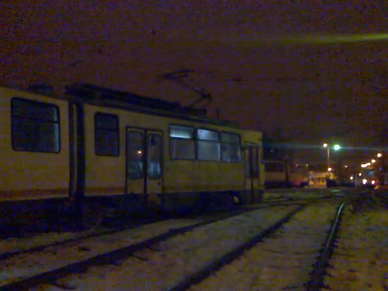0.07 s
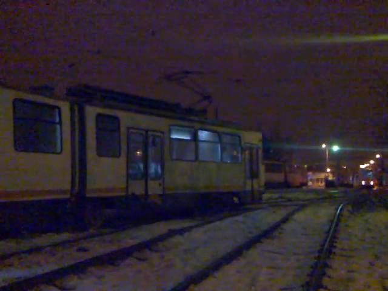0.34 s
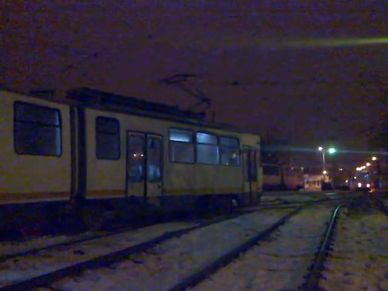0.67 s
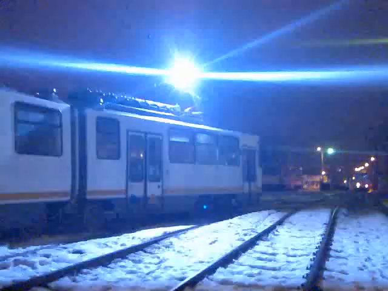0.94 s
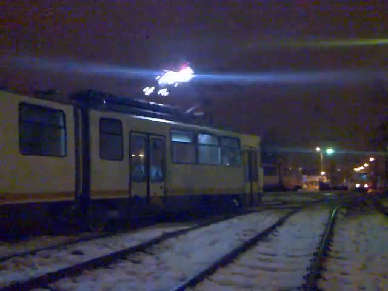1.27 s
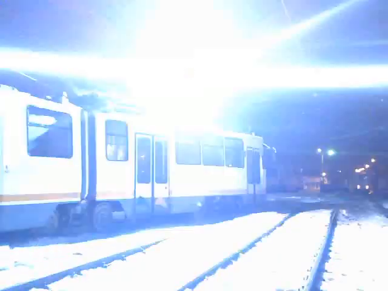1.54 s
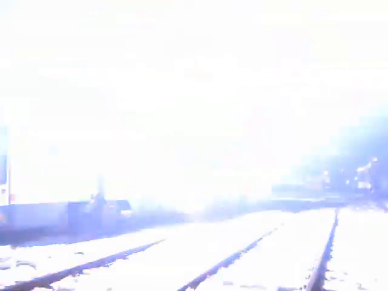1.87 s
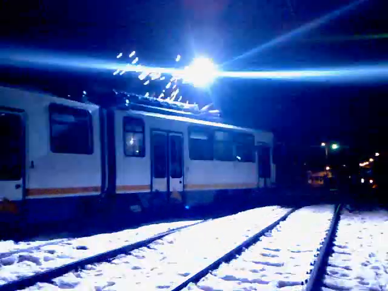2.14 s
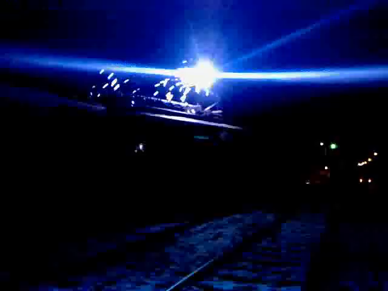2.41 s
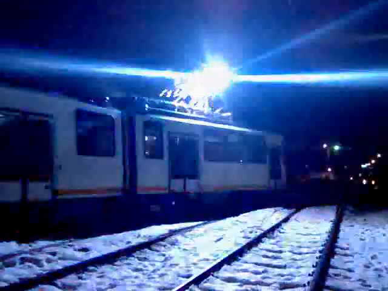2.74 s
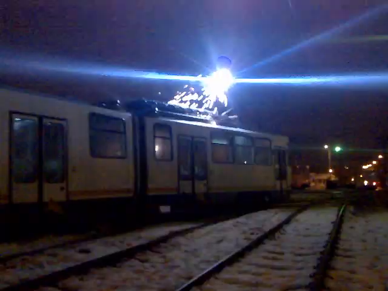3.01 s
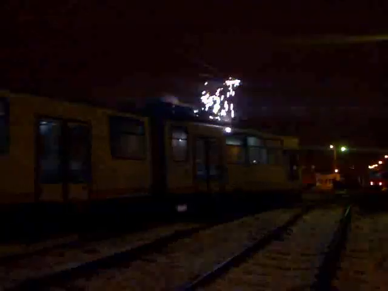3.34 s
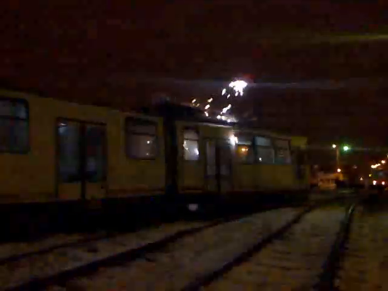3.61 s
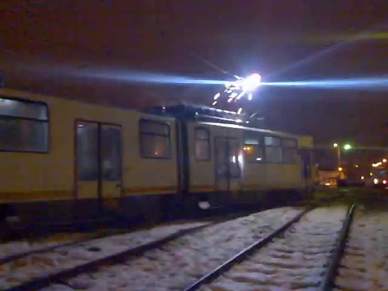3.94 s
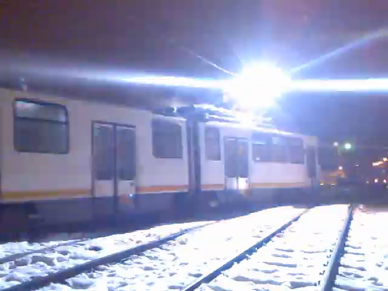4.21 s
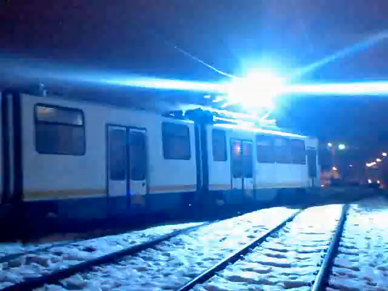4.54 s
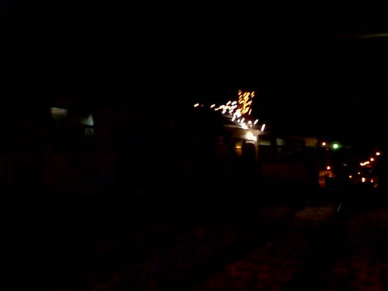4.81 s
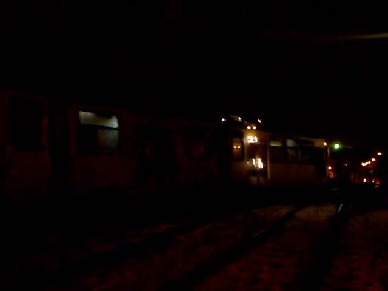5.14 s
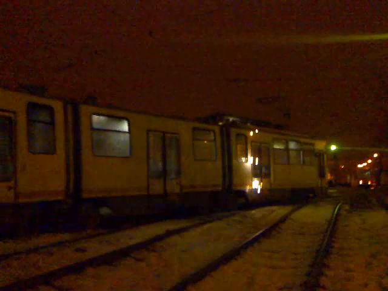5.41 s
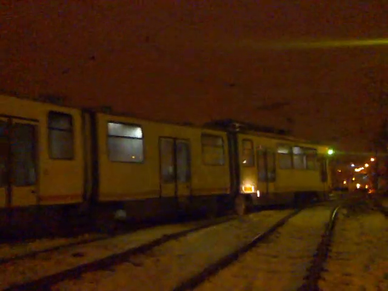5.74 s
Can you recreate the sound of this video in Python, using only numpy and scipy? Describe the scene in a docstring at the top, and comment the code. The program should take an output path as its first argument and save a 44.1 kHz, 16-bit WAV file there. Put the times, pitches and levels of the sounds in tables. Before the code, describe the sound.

Harsh electric arcs crackle, buzz and snap from a tram's overhead wire, over the low rumble and knocks of the slowly rolling car.

```python
"""A snowy tram yard at night: a tram creeps through, its pantograph arcing on an icy overhead wire.
Each loss of contact burns and fries; sparks snap, flashovers crack, and heated air thumps after two.
The car roof, the ground and the yard echo the sparks. Underneath, the tram rumbles, hisses, whines
and knocks, and wind buffets the microphone. A limiter holds the loudest arcs."""
import sys
import numpy as np
from scipy import signal
from scipy.fft import rfft, irfft
from scipy.io import wavfile
from scipy.ndimage import uniform_filter1d, minimum_filter1d

SR = 44100
rng = np.random.default_rng(int(sys.argv[2]) if len(sys.argv) > 2 else 0)


def master(y):
    """Save y as 16-bit WAV."""
    cut = np.clip(np.atleast_2d(y).T, -1, 1)
    pcm = np.round(cut * 32767)  # scale
    wavfile.write(sys.argv[1], SR, pcm.astype(np.int16))


N = 254456
T = np.arange(N) / SR


def undb(db):
    """Decibels to gain."""
    return 10 ** (np.asarray(db) / 20)


def curve(rows, column=1):
    """One table column, linearly interpolated over time."""
    rows = np.array(rows)
    return np.interp(T, rows[:, 0], rows[:, column])


def unit_rms(x):
    """Scale to rms 1."""
    return x / np.sqrt(np.mean(x ** 2))


def add(out, start_s, x):
    """Mix x into out from start_s on."""
    i = max(int(start_s * SR), 0)
    out[i:i + len(x)] += x[:max(N - i, 0)]


def bin_gains(spectrum, size):
    """Gain per FFT bin from (f/Hz, level/dB) points."""
    hz, db = np.transpose(spectrum)
    return undb(np.interp(np.log(np.fft.rfftfreq(size, 1 / SR) + 1), np.log(hz), db))


def noise(spectrum, size=N):
    """Coloured noise, rms 1."""
    return unit_rms(irfft(rfft(rng.standard_normal(size)) * bin_gains(spectrum, size), size))


def pulse(spectrum, size=1024):
    """Minimum-phase pulse, peak 1."""
    cepstrum = irfft(np.log(bin_gains(spectrum, size)))
    cepstrum[1:size // 2] *= 2
    cepstrum[size // 2 + 1:] = 0
    wave = irfft(np.exp(rfft(cepstrum)))
    return wave / np.abs(wave).max()


def lowpass(x, hz):
    """One-pole treble loss."""
    return signal.sosfilt(signal.butter(1, min(hz, SR / 2 - 1000), fs=SR, output="sos"), x)


def split(x, hz):
    """Complementary bands below and above hz."""
    bin_hz = np.fft.rfftfreq(len(x), 1 / SR)
    below = irfft(rfft(x) / (1 + (bin_hz / hz) ** 8), len(x))
    return below, x - below


def wander(rate_hz):
    """Smooth random drift, rms 1."""
    hold = max(int(SR / rate_hz), 1)
    steps = np.repeat(rng.standard_normal(N // hold + 1), hold)
    return unit_rms(uniform_filter1d(steps, hold)[:N])


def sine(hz):
    """Sine following a frequency track."""
    return np.sin(2 * np.pi * np.cumsum(hz) / SR)


# microphone hiss: t/s, level/dB
MIC_HISS_LEVEL = [(0, -52), (.2, -55), (.35, -51), (.6, -59), (1.0, -62.5), (5.77, -67)]
# gusts: peak t/s, half width/s, level/dB
GUSTS = [(0, 0.0094, -17), (.125, 0.0198, -22.5), (.22, 0.018, -33.5), (0.326, 0.0385, -22.5),
         (.39, 0.069, -33.5)]
# wind buffeting: f/Hz, level/dB
BUFFET_SPECTRUM = [(15, -15.5), (35, -5.5), (70, 1.5), (130, -4.5), (190, -9.5), (300, -34), (600, -40.5),
                   (2000, -54.5)]


def wind(breeze_db=-63):
    """Gusts over a light breeze buffet the microphone, above its thin hiss."""
    gusts = sum(undb(db) * np.exp(-((T - peak_s) / width_s) ** 2) for peak_s, width_s, db in GUSTS)
    buffet = noise(BUFFET_SPECTRUM) * (undb(breeze_db) + gusts)
    return buffet + rng.standard_normal(N) * undb(curve(MIC_HISS_LEVEL))


# running gear: t/s, rumble level/dB, hiss level/dB
GEAR_LEVELS = [(0, -38.5, -49.5), (.4, -38, -49), (.65, -49, -59), (1.0, -50, -60.5), (1.3, -40, -46),
               (3.3, -46.5, -55), (3.7, -42.5, -50.5), (3.9, -46, -51), (4.35, -36.5, -45),
               (4.93, -47, -52.5), (5.1, -41, -48), (5.25, -48, -54), (5.5, -41, -49), (5.77, -42, -49.5)]
# rolling rumble: f/Hz, level/dB
RUMBLE_SPECTRUM = [(15, -14), (35, 1), (70, 3), (130, -4.5), (230, -2.5), (320, -7.5), (430, -24),
                   (700, -40), (2000, -58)]
# machinery hiss: f/Hz, level/dB
HISS_SPECTRUM = [(100, 5.5), (400, 0), (600, 6), (1000, 1.5), (1500, 2.5), (2000, -3), (2500, 4),
                 (3400, -7), (4000, -4), (5200, -8.5), (6500, -14), (9000, -29.5), (16000, -19)]
# machinery tones: f/Hz, relative level/dB
MACHINE_TONES = [(562, -11.5), (2405, -13.5), (2535, -16.5), (2962, -21), (3897, -19), (5300, -23)]
# all tones against the hiss: t/s, gain/dB
TONE_GAIN = [(0, -5.5), (4.9, 2), (5.1, 0.5), (5.77, 7)]


def running_gear():
    """The rolling car rumbles; its machinery hisses, with faint wavering tones."""
    rumble = noise(RUMBLE_SPECTRUM) * undb(curve(GEAR_LEVELS) + 1.19 * wander(18))
    tones = sum(sine(hz + 7 * wander(45)) * undb(db + 4.26 * wander(5.8)) for hz, db in MACHINE_TONES)
    hiss = noise(HISS_SPECTRUM) * undb(1.39 * wander(35))
    machinery = hiss + tones * undb(curve(TONE_GAIN))
    return rumble + machinery * undb(curve(GEAR_LEVELS, column=2))


# motor whine: t/s, f/Hz, level/dB
WHINE = [(3.8, 395, -83.5), (4.02, 407, -50), (4.13, 414, -46), (4.3, 431, -43.5), (4.45, 434, -48),
         (4.65, 442, -66), (4.9, 450, -67)]


def motor():
    """The traction motor's whine rises in pitch, swells and fades."""
    return sine(curve(WHINE) + 3 * wander(30)) * undb(curve(WHINE, column=2))


# wheel and coupling knocks: t/s, thud level/dB, clank level/dB
KNOCKS = [(3.688, -29.5, -59.5), (4.544, -29, -51.5), (4.635, -31.5, -65.5), (4.724, -30.5, -54),
          (4.821, -31, -51.5), (5.038, -30.5, -45.5), (5.275, -39, -39), (5.426, -27.5, -48.5),
          (5.62, -49, -36), (5.739, -32, -47.5)]
# low thud of car body or heated air: f/Hz, level/dB
THUD_SPECTRUM = [(20, -1), (60, 2.5), (230, -1.5), (320, -8.5), (450, -29.5), (1200, -50)]
# rattling steel: f/Hz, level/dB
CLANK_SPECTRUM = [(200, -2), (650, 13), (1400, -7), (2400, -6), (4000, -17.5), (9000, -37.5)]


def knocks(thud_t60_s=0.1645, clank_t60_s=0.229, attack_s=0.0027):
    """Wheels and couplings shake the car body low down and rattle its steel."""
    out, age = np.zeros(N), T[:SR // 3]
    for start_s, thud_db, clank_db in KNOCKS:
        thud = noise(THUD_SPECTRUM, len(age)) * undb(thud_db - 60 * age / thud_t60_s)
        clank = noise(CLANK_SPECTRUM, len(age)) * undb(clank_db - 60 * age / clank_t60_s)
        add(out, start_s, (thud + clank) * (1 - np.exp(-age / attack_s)))
    return out


# pressure thumps of two big flashovers: t/s, level/dB
THUMPS = [(1.099, -21.5), (1.532, -33.5)]


def thumps(attack_s=0.0028, t60_s=0.335):
    """Air heated by a big flashover gives a low thump."""
    out, age = np.zeros(N), T[:SR // 3]
    for start_s, db in THUMPS:
        envelope = undb(db - 60 * age / t60_s) * (1 - np.exp(-age / attack_s))
        add(out, start_s, noise(THUD_SPECTRUM, len(age)) * envelope)
    return out


def wash(cutoff_hz, t60_s, attack_s):
    """Diffuse reflections: 1 s of decaying noise, energy 1."""
    age = T[:SR]
    envelope = undb(-60 * age / t60_s) * (1 - np.exp(-age / attack_s))
    return unit_rms(lowpass(rng.standard_normal(SR), cutoff_hz) * envelope) / np.sqrt(SR)


# reflections off roof, car side and ground: delay/s, gain/dB
ECHOES = [(.00146, -8.5), (.00644, -19.5), (.0079, -38.5), (0.013, -45.5)]


def yard(x, scatter_db=-7, tail_db=-20):
    """Direct sound, near echoes, quick scatter off the car and the yard's long tail."""
    response = np.zeros(SR)
    response[0] = 1
    for delay_s, db in ECHOES:
        add(response, delay_s, undb([db]))
    response += undb(scatter_db) * wash(cutoff_hz=11900, t60_s=0.0823, attack_s=0.00065)
    response += undb(tail_db) * wash(cutoff_hz=5000, t60_s=0.92, attack_s=0.0318)
    return signal.fftconvolve(x, response)[:N]


def sparks(rate_hz, spread_db):
    """Randomly timed impulses of uneven size, rms 1."""
    lit = rng.random(N) < rate_hz / SR
    return unit_rms(lit * undb(spread_db * np.minimum(rng.standard_normal(N), 2)))


def restrikes(rate_hz=114, jitter=0.16, spread_db=6.3):
    """The arc breaks and catches again in an uneven buzz, rms 1."""
    cycles = np.cumsum(rate_hz * np.exp(jitter * wander(130))) / SR
    strikes = np.diff(np.floor(cycles), prepend=0)
    return unit_rms(strikes * undb(spread_db * wander(150)))


BODY_HZ = 1763  # a fat arc has more sound below this, a thin one less
# arc burns: t/s, length/s, level/dB, growth over the burn/dB, body gain/dB, sputter gain/dB
BURNS = [(1.018, 0.078, -33, -2, 2, -4.5), (1.10, 0.0526, -21, -4.5, 2.5, 1),
         (1.162, 0.1387, -27, 1, -15.5, -9), (1.315, 0.178, -32.5, 4.5, -12.5, -4),
         (1.548, 0.1752, -31, 2.5, 8.5, -1.5), (1.777, 0.1656, -9, -1, 1, -2.5),
         (1.967, 0.366, -44.5, 3, -2.5, 0.5), (2.168, 0.099, -20.5, 7, -0.5, 4),
         (2.283, 0.157, -33.5, -2.5, 1, 1), (2.484, 0.1545, -29, -5, 1, -1), (2.65, 0.1854, -40, -3, -3, 3),
         (2.846, 0.1868, -40.5, -0.5, 6, 4.5), (3.059, 0.1014, -37.5, 1.5, 6, 3.5),
         (3.374, 0.0395, -39.5, 2.5, 8, 1), (3.603, 0.1365, -43.5, -5.5, -2, 1.5),
         (3.923, 0.1757, -43.5, 6, -2, -4.5), (4.103, 0.0799, -28, -6.5, 5.5, -1.5),
         (4.247, 0.191, -33, -7.5, 5, -0.5), (4.318, 0.0483, -26, -2.5, 2.5, -2)]


def burns(strike_s=0.00845, quench_s=0.01444, restrike_db=-4, spit_db=-8, fry_db=-3, flutter_db=2):
    """At each loss of contact the arc catches, fries, sputters and quenches."""
    sputter = undb(restrike_db) * restrikes() + undb(spit_db) * sparks(rate_hz=60, spread_db=3)
    fry = sparks(rate_hz=3500, spread_db=3.5) * undb(fry_db + flutter_db * wander(180))
    whole, weighted, age = np.zeros(N), np.zeros(N), T[:SR // 3]
    for start_s, length_s, db, growth_db, body_db, sputter_db in BURNS:
        span = slice(int(start_s * SR), int(start_s * SR) + len(age))
        envelope = (1 - np.exp(-age / strike_s)) * np.exp(-np.maximum(age - length_s, 0) / quench_s)
        gain = undb(db + growth_db * np.minimum(age / length_s, 1))
        burn = (fry[span] + undb(sputter_db) * sputter[span]) * envelope * gain
        add(whole, start_s, burn)
        add(weighted, start_s, burn * undb(body_db))
    body, _ = split(weighted, BODY_HZ)
    _, edge = split(whole, BODY_HZ)
    return body + edge


# flashovers: t/s, level/dB, length/s, cutoff f/Hz, body gain/dB
FLASHOVERS = [(1.1001, -13, 0.0052, 4020, 0), (1.176, -24, 0.0066, 4000, -4.5),
              (1.2024, -11.5, 0.00301, 6000, -12), (1.384, -20, 0.00293, 3500, -11.5),
              (1.5319, -7, 0.00452, 2500, -1.5), (1.619, -22.5, 0.00756, 7100, 3),
              (2.357, -19, 0.00546, 6030, -9), (2.384, -22.5, 0.00703, 4000, -2.5),
              (2.503, -18.5, 0.00536, 2490, -1), (2.536, -20.5, 0.00576, 2800, 1),
              (2.9593, -29, 0.0052, 3480, 1), (3.935, -37.5, 0.0069, 4970, -6.5)]


def flashovers(decay_s=0.001586):
    """Each tight volley of sparks is a noise burst that holds, then dies."""
    out, age = np.zeros(N), T[:SR // 30]
    for start_s, db, length_s, cutoff_hz, body_db in FLASHOVERS:
        volley = unit_rms(lowpass(rng.standard_normal(len(age)), cutoff_hz))
        body, edge = split(volley, BODY_HZ)
        envelope = np.exp(-np.maximum(age - length_s, 0) / decay_s)
        add(out, start_s, undb(db) * (undb(body_db) * body + edge) * envelope)
    return out


# loudest single sparks: t/s, level/dB
SNAPS = [(1.2966, -12), (1.3683, -6), (1.4496, -8.5), (1.6917, -5), (1.7644, -1), (1.7883, -1), (2.0388, 9),
         (2.1772, 0), (2.3734, -5), (2.4121, -6), (2.4457, -9.5), (2.4827, -9.5), (2.4912, -7),
         (2.856, -16), (2.9384, -13.5), (3.0152, -18.5), (3.044, -14.5), (3.071, -13), (3.1189, -9),
         (3.3802, -18.5), (3.6123, -24.5), (3.6519, -14.5), (3.806, -25), (4.1140, -13), (4.755, -25)]
# one spark's crack: f/Hz, level/dB
CRACK_SPECTRUM = [(40, -12), (120, -10), (250, -0.5), (450, -4), (750, -2), (1500, -1.5), (1900, 2),
                  (2700, 5), (3400, -0.5), (4800, -2.5), (7000, -9.5), (10000, -18.5), (13000, -27),
                  (16000, -25)]


def arc(recede_from_s=2.22, dull_above_hz=8300, dull_db_per_s=4):
    """Burns, flashovers and single sparks share one crack, duller as the tram recedes."""
    crack = pulse(CRACK_SPECTRUM)
    drive = (burns() + flashovers()) / np.sqrt(np.sum(crack ** 2))
    for start_s, db in SNAPS:
        add(drive, start_s, undb([db]))
    crackle = signal.fftconvolve(drive, crack)[:N]
    lower, treble = split(crackle, dull_above_hz)
    return lower + treble * undb(-dull_db_per_s * np.maximum(T - recede_from_s, 0))


def scene():
    """Arc overhead, tram below, wind close by; mono."""
    return (yard(arc()) + thumps() + running_gear() + motor() + knocks() + wind())[None]


def record(dry, ceiling=0.997, clip=0.645, window_samples=130, top_hz=16200):
    """A fast limiter ducks the loudest arcs; a soft clip and a steep lowpass follow."""
    needed_gain = np.minimum(1, ceiling / (np.abs(dry) + 1e-9))
    gain = uniform_filter1d(minimum_filter1d(needed_gain, window_samples), window_samples)
    limited = dry * gain
    rounded = limited / (1 + (limited / clip) ** 6) ** (1 / 6)
    return signal.sosfilt(signal.ellip(8, 0.2, 80, top_hz, fs=SR, output="sos"), rounded)


dry = scene()
out = record(dry)
master(out)
```